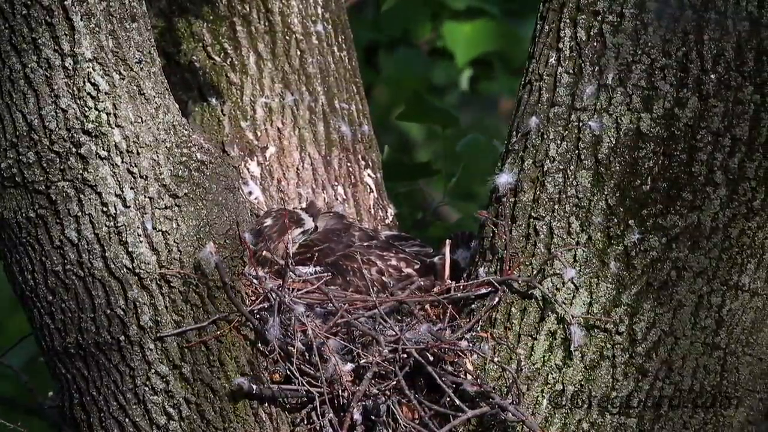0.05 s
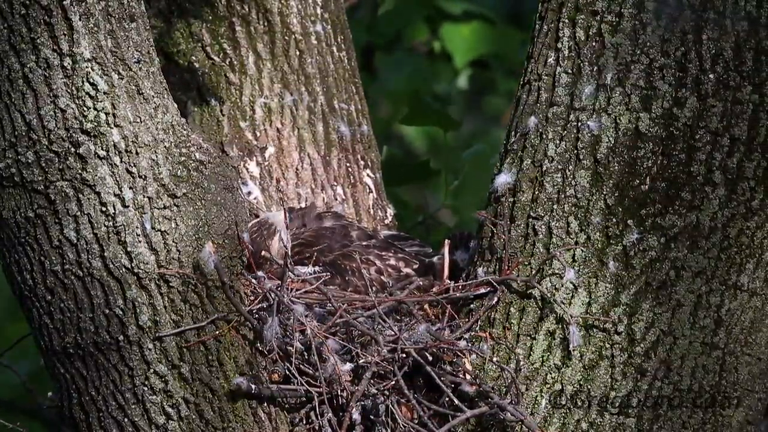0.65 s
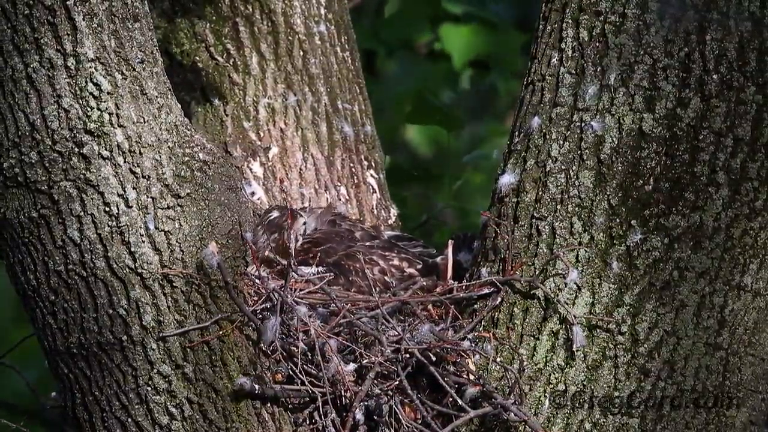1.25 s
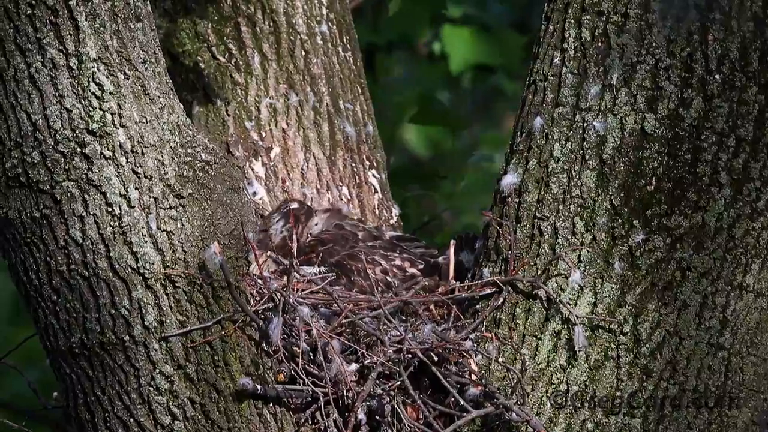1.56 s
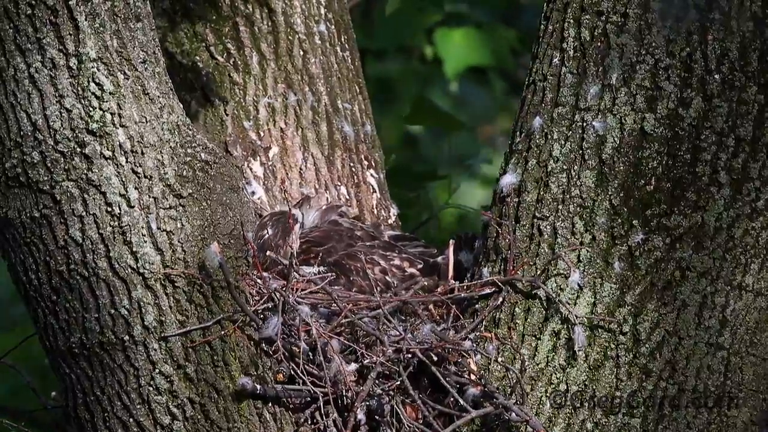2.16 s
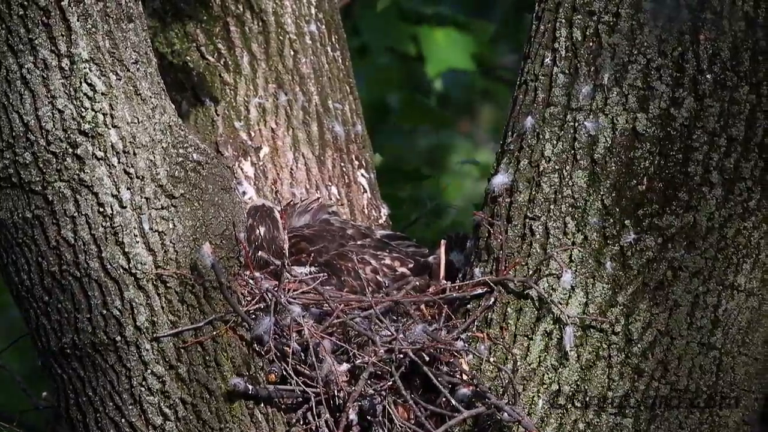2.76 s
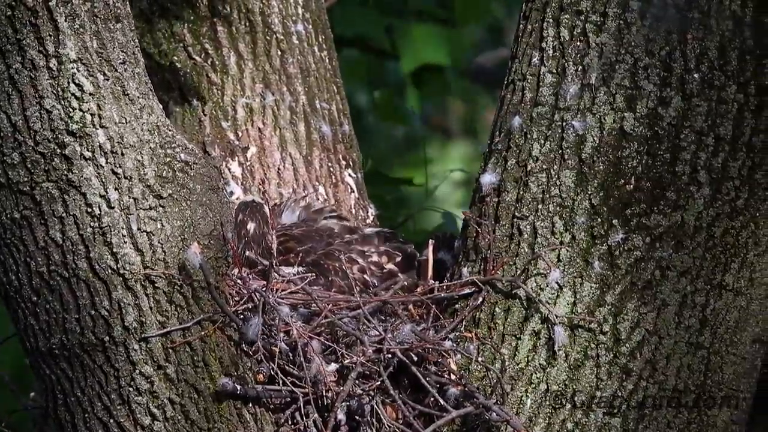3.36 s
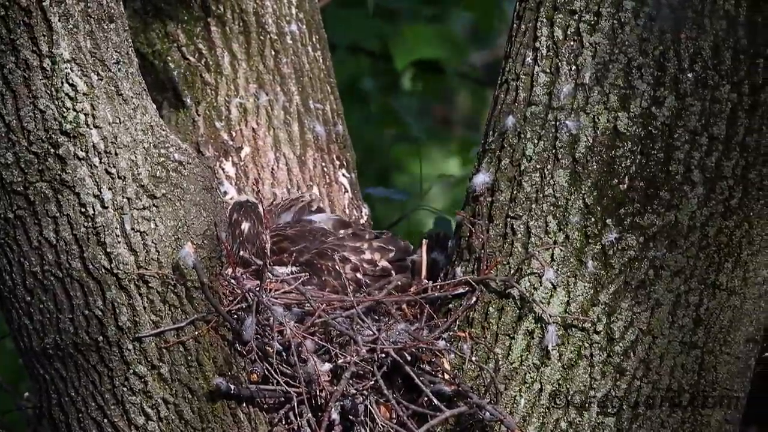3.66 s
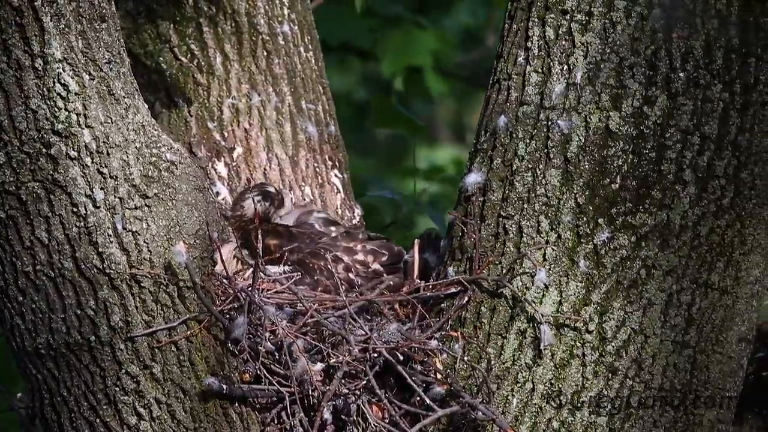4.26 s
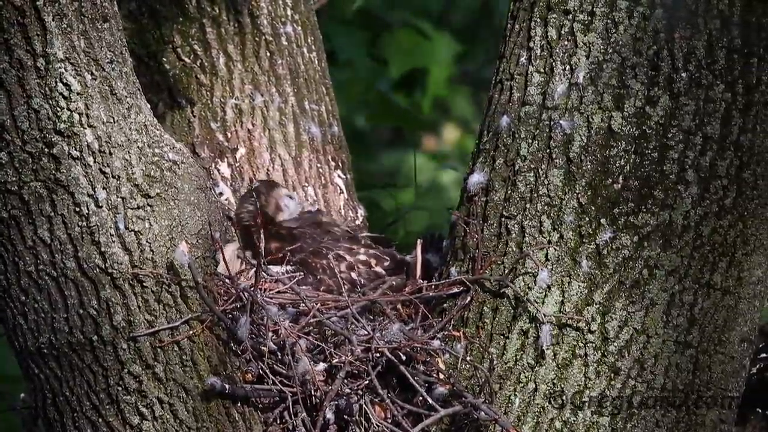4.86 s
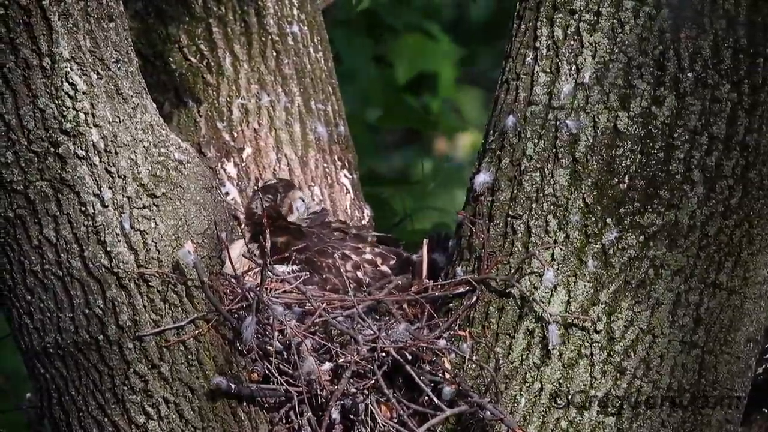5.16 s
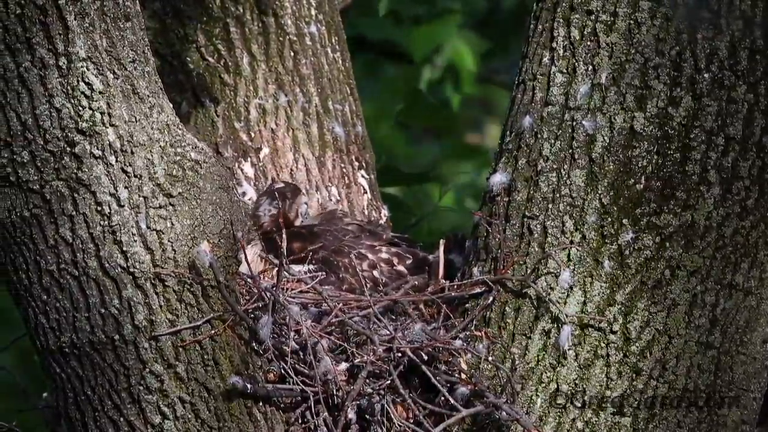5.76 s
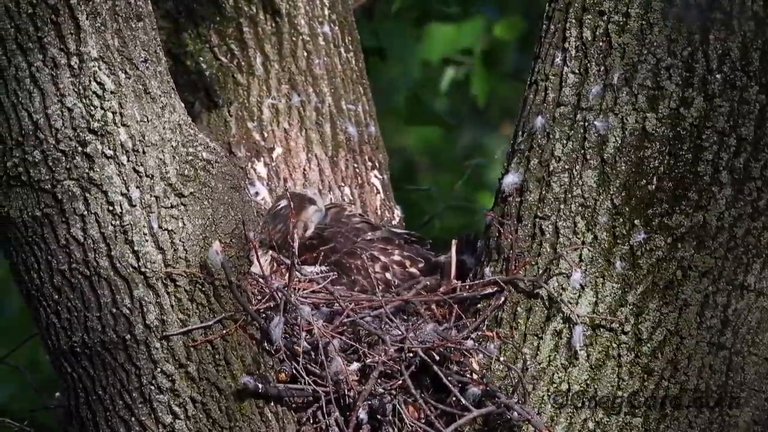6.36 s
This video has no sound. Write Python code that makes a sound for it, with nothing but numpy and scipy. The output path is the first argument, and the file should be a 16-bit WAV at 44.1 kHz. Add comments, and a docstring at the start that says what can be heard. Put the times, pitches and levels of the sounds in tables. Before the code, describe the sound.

A hawk opens with fourteen sharp, raspy keks in quick succession, the last a little lower and weaker. Softer whistles and thin high chirps from small woodland birds follow, with faint twig ticks and one dull knock of a stick. A nearby songbird then sings bright, alternating notes and a long downward slide. The trees scatter every call, while gentle gusts rumble at the microphone over a steady airy hiss.

```python
"""Hawk and songbirds in a wood

A hawk calls fourteen rapid 'kek' notes, harmonic stacks shaped by its throat. Then songbirds whistle,
tick and sing in almost pure tones, near and far; twigs tick and a stick knocks in the nest.
Trunks and leaves scatter every call. Light wind rumbles at the microphone over a faint hiss,
and a mains-hum filter leaves a fine 60 Hz flutter behind the hawk's notes."""
import sys
import numpy as np
from scipy import signal
from scipy.fft import rfft, irfft, next_fast_len
from scipy.io import wavfile
from scipy.ndimage import uniform_filter1d

SR = 44100
rng = np.random.default_rng(int(sys.argv[2]) if len(sys.argv) > 2 else 0)


def transcribe(signal):
    """Save signal, clipped to [-1, 1], as a 16-bit WAV file at the path in sys.argv[1]."""
    frames = np.atleast_2d(signal).T
    limited = np.clip(frames, -1, 1)
    pcm = np.round(limited * 32767).astype(np.int16)
    wavfile.write(sys.argv[1], SR, pcm)


N = 291501
TIME = np.arange(N) / SR


def from_db(db):
    return 10 ** (np.asarray(db) / 20)


def unit(x):
    return x / np.sqrt(np.mean(x ** 2) + 1e-20)


def on_log_axis(points, hz):
    """Interpolates a table over log frequency."""
    f, value = np.transpose(points)
    return np.interp(np.log(hz + 1), np.log(f + 1), value)


def add(track, s, sound):
    """Mixes a sound in at time s."""
    start = round(s * SR)
    sound = sound[max(-start, 0):]
    part = track[max(start, 0):][:len(sound)]
    part += sound[:len(part)]


def wander(size, hz):
    """Smooth random motion, rms about 1, up to about hz."""
    f = np.fft.rfftfreq(2 * next_fast_len(size // 2 + SR // 10, True), 1 / SR)
    white = rfft(rng.standard_normal(2 * len(f) - 2))
    return unit(irfft(white * np.exp(-(f / hz) ** 2)))[:size]


def noise(spectrum):
    """Steady shaped noise, rms 1."""
    size = 2 * next_fast_len(N // 2 + 1)
    gain = from_db(on_log_axis(spectrum, np.fft.rfftfreq(size, 1 / SR)))
    return unit(irfft(rfft(rng.standard_normal(size)) * gain)[:N])


def woods(x, near_db, near_t60_s, far_db, bright_db=0):
    """Direct sound, quick scatter off nearby trunks, long tail with its treble raised by bright_db."""
    # tail decay: f/Hz, T60/s
    decay = [(500, 0.31), (1500, 1.0), (3000, 0.77), (5000, 0.73), (8000, 0.47), (14000, 0.1)]
    t = TIME[:SR]
    reflections = rng.standard_normal((2, SR)) * (rng.random((2, SR)) < 2500 / SR)
    near, far = reflections * (1 - np.exp(-(t / .003) ** 2))
    near = near * from_db(-60 * t / near_t60_s)
    hz, s, bands = signal.stft(far, SR, nperseg=256)
    bands = bands * from_db(-60 * s / on_log_axis(decay, hz)[:, None])
    far_norm = np.linalg.norm(signal.istft(bands, SR, nperseg=256)[1])
    shelf = from_db(bright_db * np.interp(hz, [4500, 5800], [0, 1]))
    far = signal.istft(bands * shelf[:, None], SR, nperseg=256)[1][:SR]
    echoes = from_db(near_db) * near / np.linalg.norm(near) + from_db(far_db) * far / far_norm
    return x + signal.fftconvolve(x, echoes)[:len(x)]


def hum_filter(x, feedback, mains_hz=60):
    """Inverted, fading echoes one mains cycle apart notch every mains harmonic."""
    period = round(SR / mains_hz)
    taps = np.zeros(20 * period)
    taps[::period] = np.r_[1, (feedback - 1) * feedback ** np.arange(19)]
    return signal.fftconvolve(x, taps)[:len(x)]


def wind(breeze_db=-37.5, air_db=-48.5):
    """Gusts rumble at the microphone over the steady wash of the wood."""
    # wind puffs: peak t/s, half length/s, level/dB
    gusts = [(0, 0.042, -31), (0.292, 0.033, -30.5), (0.802, 0.022, -30), (.98, 0.092, -34.5),
             (1.305, 0.032, -26), (1.93, 0.1, -38.5), (2.58, 0.018, -35.5), (2.977, 0.073, -37),
             (3.344, 0.066, -34.5), (3.88, .035, -28.5), (4.04, 0.05, -32), (4.177, .05, -33),
             (4.663, 0.0085, -24.5), (4.802, 0.032, -31), (4.964, 0.058, -29.5), (5.857, 0.048, -32)]
    # noise spectra: f/Hz, relative density/dB
    rumble_spectrum = [(10, -7.5), (25, -2.5), (42, 1), (58, -4), (72, -1.5), (100, -12), (130, -19),
                       (220, -48), (500, -80)]
    air_spectrum = [(40, -1), (120, 2), (200, -2), (320, -7), (500, -14), (800, -17.5), (1300, -22),
                    (2000, -27.5), (3200, -27.5), (4000, -29), (5000, -36), (7000, -38), (10000, -40.5),
                    (15000, -43)]
    rumble = noise(rumble_spectrum)
    rumble /= np.sqrt(uniform_filter1d(rumble ** 2, size=3500))  # only breeze and gusts set its swells
    breeze = from_db(breeze_db + .7 * wander(N, hz=3.3))
    gust_power = sum(from_db(db) ** 2 * np.exp(-((TIME - s) / half_s) ** 2) for s, half_s, db in gusts)
    air = noise(air_spectrum) * from_db(air_db + .16 * wander(N, hz=11.4))
    return rumble * np.sqrt(breeze ** 2 + gust_power) + hum_filter(air, feedback=.7)


def nest(knock_at_s=4.106, knock_rise_s=.0018, twig_decay_s=.002):
    """The hawk shifts: dry twigs tick, and once a stick knocks dully on wood."""
    # wood knock: f/Hz, level/dB, T60/s
    knock = (485, -40.5, 0.06)
    # twig ticks: t/s, level/dB
    twigs = [(2.921, -62), (3.101, -55), (4.107, -54)]
    # their spectrum: f/Hz, relative density/dB
    twig_spectrum = [(800, -20), (1800, -2), (3200, 3), (5000, -6), (9000, -22)]
    hz, db, t60_s = knock
    out, t = np.zeros(N), TIME[:SR // 4]
    modes = sum(gain * np.sin(2 * np.pi * ratio * hz * t)
                for ratio, gain in [(1, 1), (.9, .62), (1.88, .27)])
    add(out, knock_at_s, modes * np.minimum(t / knock_rise_s, 1) * from_db(db - 60 * t / t60_s))
    for s, db in twigs:
        add(out, s, noise(twig_spectrum)[:len(t)] * from_db(db) * np.exp(-t / twig_decay_s))
    return woods(out, near_db=-4, near_t60_s=.23, far_db=-18)


def contour(rows):
    """Note drawn through breakpoints: t/s, f/Hz, level/dB."""
    s, *columns = np.transpose(rows)
    t = np.arange(s.min(), s.max(), 1 / SR)
    return [t] + [np.interp(t, s, column) for column in columns]


def slur(s, length_s, from_hz, to_hz, bow_hz, db, swell_db=0, edge_db=-10):
    """Note on a bowed glide, fading toward both ends."""
    t = np.arange(0, length_s, 1 / SR)
    u = t / length_s
    bow = 1 - (2 * u - 1) ** 2
    hz = from_hz + (to_hz - from_hz) * u + bow_hz * bow
    return s + t, hz, db + swell_db * (u - .5) + edge_db * (1 - bow) ** 2


def scoop(s, db, half_s=.052, from_hz=5400, bottom_hz=3690, to_hz=4450):
    """Note that drops in softly and swells as it turns up again."""
    u = np.linspace(-1, 1, round(2 * half_s * SR))
    hz = bottom_hz + (np.where(u < 0, from_hz, to_hz) - bottom_hz) * u ** 2
    return s + half_s * u, hz, db + 6 * u


def peaked(s, shoulder_hz, peak_hz, width_s, before_db, after_db):
    """Note that climbs to a shoulder, flicks up with a quiver and settles."""
    climb_s, settle_s, settle_tau_s = .048, .046, .014
    from_hz, to_hz, flick_db, edge_db = 5200, 5240, -4.5, -9
    t = np.arange(-climb_s, settle_s, 1 / SR)
    away = np.where(t < 0, -t / climb_s, t / settle_s)
    climb_hz = shoulder_hz + (from_hz - shoulder_hz) * away ** 2
    settle_hz = to_hz + (shoulder_hz - to_hz) * np.exp(-t / settle_tau_s)
    flick = np.exp(-(t / width_s) ** 2)
    quiver = 1 - .16 * abs(wander(len(t), hz=600))
    hz = np.where(t < 0, climb_hz, settle_hz) + (peak_hz - shoulder_hz) * flick * quiver
    db = np.interp(t, [-width_s, width_s], [before_db, after_db])
    return s + t, hz, db + flick_db * flick + edge_db * away ** 4


def sing(notes, waver, flutter_db, octave_db):
    """Almost pure, trembling tone; its octave grows with pitch and is at octave_db for a 7 kHz note."""
    out = np.zeros(N)
    for t, hz, db in notes:
        phase = 2 * np.pi * np.cumsum(hz * (1 + waver * wander(len(t), hz=215))) / SR
        tone = np.sin(phase) + from_db(octave_db) * (hz / 7000) ** 5 * np.sin(2 * phase)
        fade = np.clip(np.minimum(t - t[0], t[-1] - t) / .002, 0, 1)
        add(out, t[0], np.sqrt(2) * tone * fade * from_db(db + flutter_db * wander(len(t), hz=90)))
    return out


def distant_bird():
    """Level whistles from deep in the wood, arriving mostly scattered."""
    # whistles: t/s, length/s, from f/Hz, to f/Hz, bow/Hz, relative level/dB
    slurs = [(2.704, 0.067, 2420, 2360, 10, -66.5), (3.299, 0.31, 2275, 2280, 4, -67.5),
             (3.66, 0.267, 2258, 2220, -1, -70), (4.97, 0.16, 2350, 2280, -3, -66),
             (5.299, 0.48, 2273, 2280, -10, -71)]
    song = sing([slur(*row) for row in slurs], waver=.013, flutter_db=4, octave_db=-52)
    return from_db(-8.5) * woods(song, near_db=-14, near_t60_s=.37, far_db=3)


def far_bird():
    """Plain glides and three scoops, blurred by the trees."""
    # glides: t/s, length/s, from f/Hz, to f/Hz, bow/Hz, relative level/dB
    slurs = [(3.949, 0.054, 3810, 2620, 171, -62.5), (4.025, 0.068, 2545, 3360, 283, -64),
             (4.106, .08, 4360, 4270, 8, -63), (4.178, 0.073, 4290, 3190, -100, -63),
             (4.255, 0.052, 3450, 3750, -3, -64), (5.159, 0.06, 2340, 3540, 298, -62.5),
             (6.504, 0.15, 4026, 3400, -200, -62.5)]
    # scoops: bottom t/s, relative level/dB
    scoops = [(4.408, -64), (4.55, -64), (4.687, -62)]
    notes = [slur(*row) for row in slurs] + [scoop(*row) for row in scoops]
    song = sing(notes, waver=.018, flutter_db=3.8, octave_db=-40)
    return from_db(-3.5) * woods(song, near_db=-3, near_t60_s=.25, far_db=-.5)


def swooping_bird():
    """Two notes that swoop down and up again, at middle distance."""
    # breakpoints, one list a note: t/s, f/Hz, relative level/dB
    swoops = [
        [(2.235, 5500, -63), (2.255, 4990, -63.5), (2.278, 3450, -44), (2.305, 2894, -47.5),
         (2.335, 2120, -61.5), (2.36, 2910, -43.5), (2.388, 3755, -49.5), (2.402, 3220, -53),
         (2.425, 2830, -69)],
        [(3.315, 3750, -58), (3.345, 3040, -67), (3.39, 2820, -62.5), (3.42, 3060, -64)],
    ]
    song = sing(map(contour, swoops), waver=.014, flutter_db=2.5, octave_db=-40)
    return from_db(-2.9) * woods(song, near_db=-4, near_t60_s=.25, far_db=-5)


def whistling_bird():
    """A short arch, then a long drawn whistle."""
    # arch: t/s, length/s, from f/Hz, to f/Hz, bow/Hz, relative level/dB
    arch = (2.526, .096, 3820, 3640, 570, -54)
    # whistle breakpoints: t/s, f/Hz, relative level/dB
    whistle = [(2.635, 3771, -54), (2.657, 4230, -57), (2.689, 4457, -71), (2.743, 4352, -67),
               (2.779, 3850, -57), (2.823, 3430, -63), (2.907, 3310, -65.5), (3.201, 4022, -51),
               (3.279, 4107, -59.5), (3.36, 4360, -55.5)]
    song = sing([slur(*arch), contour(whistle)], waver=.0029, flutter_db=1.5, octave_db=-40)
    return from_db(-1.8) * woods(song, near_db=-12, near_t60_s=.3, far_db=-8)


def ticking_bird(half_s=.015, fall_per_s=11, edge_db=-17.5):
    """Thin ticks, each a steep downward slide."""
    # tick centres: t/s, f/Hz, level/dB
    ticks = [(3.133, 8170, -63.5), (3.311, 8300, -59), (3.458, 8200, -54.5), (3.745, 8040, -55),
             (3.868, 8200, -62), (5.848, 8300, -61.5), (6.187, 7450, -71), (6.322, 7400, -67),
             (6.434, 7500, -65), (6.568, 7380, -63), (6.605, 8500, -58)]
    t = np.arange(-half_s, half_s, 1 / SR)
    notes = [(s + t, hz * np.exp(-fall_per_s * t), db + edge_db * abs(t) / half_s)
             for s, hz, db in ticks]
    song = sing(notes, waver=.0034, flutter_db=2, octave_db=-50)
    return woods(song, near_db=-8.5, near_t60_s=.15, far_db=-6)


def near_bird():
    """Falling and peaked notes in turn, closed by a long slide; mostly direct sound."""
    # glides: t/s, length/s, from f/Hz, to f/Hz, bow/Hz, level/dB, swell/dB
    slurs = [(4.814, .036, 4900, 4000, 60, -53, 15), (4.994, .043, 4930, 4020, -30, -43, 7),
             (5.172, .046, 5200, 3780, 270, -41, 2), (5.357, .044, 5230, 4020, 220, -39, 5),
             (5.4, .036, 6300, 5700, -200, -45, 14), (5.437, .026, 6080, 5930, 0, -43, 0)]
    # peaked notes: peak t/s, shoulder f/Hz, peak f/Hz, width/s, level before/dB, level after/dB
    peaks = [(4.896, 6100, 7900, .008, -51, -49.5), (5.087, 6350, 7450, .006, -46, -40),
             (5.277, 5850, 7850, .007, -42.5, -38.5)]
    # slide breakpoints: t/s, f/Hz, level/dB
    slide = [(5.5, 9170, -57), (5.514, 8500, -51), (5.53, 8080, -46.5), (5.562, 8220, -45),
             (5.592, 7820, -41), (5.622, 7300, -49), (5.652, 7030, -42), (5.682, 6300, -46),
             (5.696, 6280, -51)]
    notes = [slur(*row) for row in slurs] + [peaked(*row) for row in peaks] + [contour(slide)]
    song = sing(notes, waver=.0095, flutter_db=2.5, octave_db=-27.5)
    return woods(song, near_db=-8.5, near_t60_s=.16, far_db=-11.5)


def kek_shape():
    """Pitch creeps up, snaps to the top, holds and sags; in the sag the voice catches, then cracks."""
    lead_s, snap_s, sag_from_s, release_from_s, end_s = .018, .002, .0121, .03, .04
    attack_db_per_s, release_db_per_s = 934, 1890
    catch_s, catch_width_s, catch_db, crack_db = .0228, .0038, -8, 1.8
    t = np.arange(-lead_s, end_s, 1 / SR)
    snap = 1 / (1 + np.exp(-t / snap_s))
    creep = .67 + 5.1 * t
    sag = (np.maximum(t - sag_from_s, 0) / (end_s - sag_from_s)) ** 2.58
    pitch_ratio = snap + (1 - snap) * creep - .361 * sag
    effort_db = attack_db_per_s * np.minimum(t - 2 * snap_s, 0)
    effort_db -= release_db_per_s * np.maximum(t - release_from_s, 0)
    catch = (t - catch_s) / catch_width_s
    effort_db += catch_db * np.exp(-catch ** 2) + crack_db * np.clip(catch, 0, 1)
    roughness = .04 + .2 * (1 - (2 * snap - 1) ** 2) + .7 * sag
    return t, pitch_ratio, effort_db, roughness


def hawk(overtone_db=-8, dulling_db=-11, air_db=-23, preroll_s=.25):
    """Each kek is a harmonic stack arching through the throat's resonances, rasping as it falls."""
    # keks: t/s, top f/Hz, relative level/dB, throat tension on overtones/dB, period doubling/0-1
    keks = [(-.028, 1536, -32, 6, 0.15), (0.122, 1565, -32, 3.5, 0.07), (.275, 1542, -32.5, 5, 0.03),
            (.431, 1545, -31.5, 1.5, 0), (.585, 1557, -31, 1.5, 0.01), (.741, 1539, -32, 4, 0.03),
            (0.898, 1524, -32.5, 4.5, 0), (1.059, 1510, -33, 3.5, 0.01), (1.218, 1527, -31.5, 4, 0),
            (1.376, 1483, -33.5, 3.5, .02), (1.53, 1511, -32.5, 2, .02), (1.687, 1489, -33.5, 2, 0),
            (1.848, 1479, -34, 0.5, 0), (2.061, 1383, -37, -1, 0.19)]
    # throat and beak response: f/Hz, gain/dB
    throat = [(600, -42), (1050, -7), (1250, -25.5), (1500, -14), (2000, -3.5), (2250, -7.5), (2600, -4),
              (3100, -2), (3500, -5), (4500, -25), (5700, -32), (6400, -49), (7500, -45), (9000, -43.5),
              (13000, -47)]
    # rushing air: f/Hz, relative density/dB
    breath_spectrum = [(1500, -22), (2500, -5), (3700, 9.5), (4800, -3), (5700, 4), (6500, -13),
                       (9000, -19), (15000, -34)]
    out, air = np.zeros(N + round(preroll_s * SR)), noise(breath_spectrum)
    t, pitch_ratio, effort_db, roughness = kek_shape()
    onset = np.clip(t / .0046, 0, 1)
    k = np.arange(2, 19)[:, None] / 2  # harmonics, and the period-doubling lines between them
    for s, top_hz, db, tension_db, doubling in keks:
        jitter = .05 * roughness * wander(len(t), hz=640) + .0056 * wander(len(t), hz=128)
        hz = top_hz * pitch_ratio * (1 + jitter)
        phase = 2 * np.pi * np.cumsum(hz) / SR
        share = np.where(k % 1 == 0, 1, (doubling + .55 * roughness) * onset)
        upper_db = overtone_db + tension_db + 1.3 * np.minimum(effort_db, 0) + dulling_db * roughness
        gains = share * from_db(on_log_axis(throat, k * hz) + (k >= 3) * upper_db)
        voice = np.sqrt(2) * (gains * np.sin(k * phase)).sum(0)
        rasp = 1 + .6 * roughness * wander(len(t), hz=880)
        breath = from_db(air_db) * (.21 + roughness) * onset * air[rng.integers(N // 2):][:len(t)]
        envelope = from_db(db + effort_db) * signal.windows.tukey(len(t), .1)
        add(out, preroll_s + s + t[0], (voice * rasp + breath) * envelope)
    # facing away, it beams its overtones into the trees: a brighter tail
    return woods(out, near_db=-12, near_t60_s=.39, far_db=-8, bright_db=8)


def scene():
    """Mono mix on two channels; the hawk is already calling at t = 0."""
    keks = hum_filter(hawk(), feedback=.64)[-N:]
    songbirds = (near_bird() + ticking_bird() + whistling_bird()
                 + swooping_bird() + far_bird() + distant_bird())
    return np.tile(keks + songbirds + nest() + wind(), (2, 1))


def record(dry, shared_db=-80.5, own_db=-69.5, cutoff_hz=15780):
    """One microphone on both channels; shared and per-channel hiss, then a band limit."""
    # each channel's own hiss: f/Hz, relative density/dB
    hiss_spectrum = [(88, -47), (150, -17), (182, -17), (262, -3.5), (687, 2.5), (1400, -9), (3970, -25),
                     (4460, -8), (15000, -5)]
    shared = from_db(shared_db) * rng.standard_normal(N)
    own = from_db(own_db) * np.array([noise(hiss_spectrum), noise(hiss_spectrum)])
    lowpass = signal.firwin(1501, cutoff_hz, window=("kaiser", 11), fs=SR)
    return signal.oaconvolve(dry + shared + own, lowpass[None], "same")


dry = scene()
out = record(dry)
transcribe(out)
```